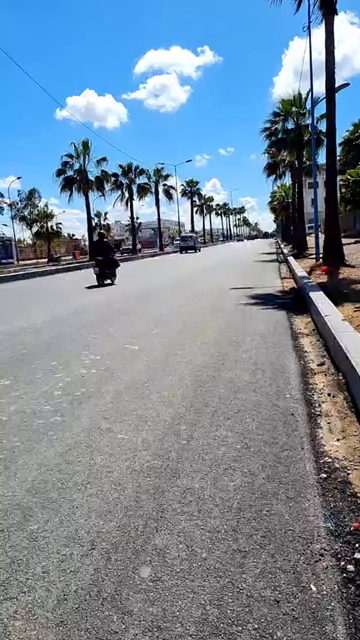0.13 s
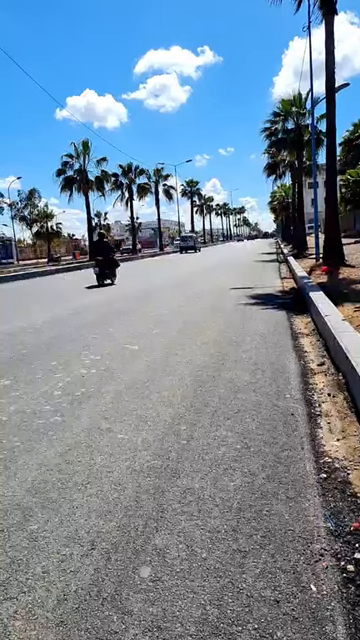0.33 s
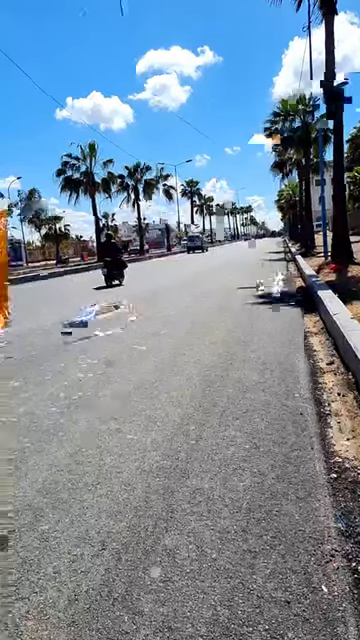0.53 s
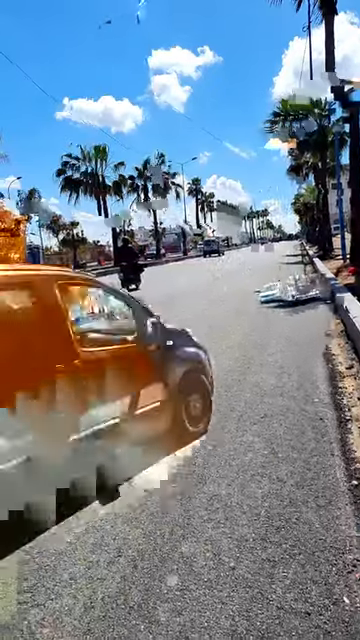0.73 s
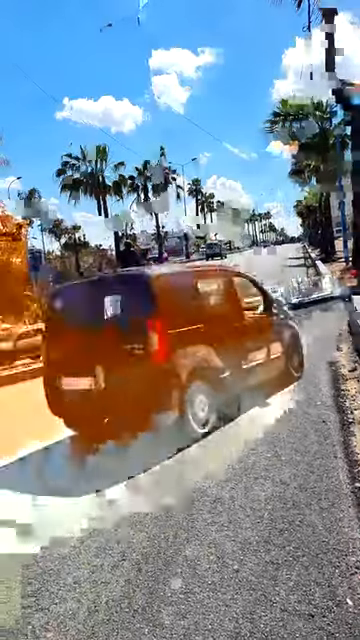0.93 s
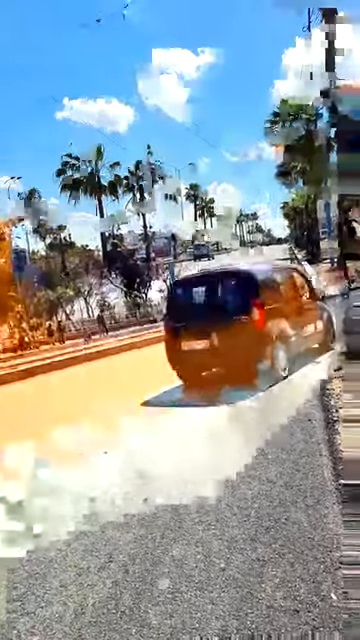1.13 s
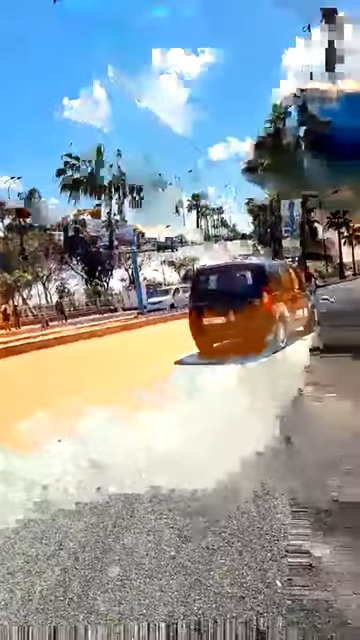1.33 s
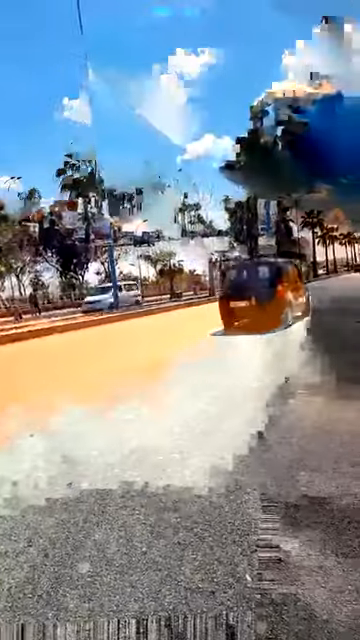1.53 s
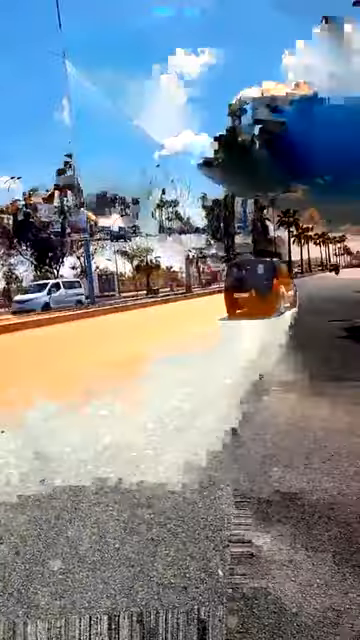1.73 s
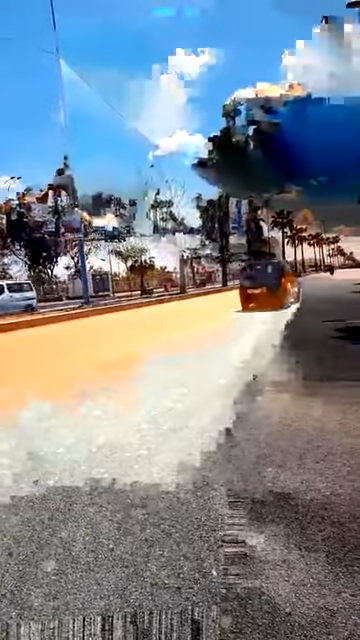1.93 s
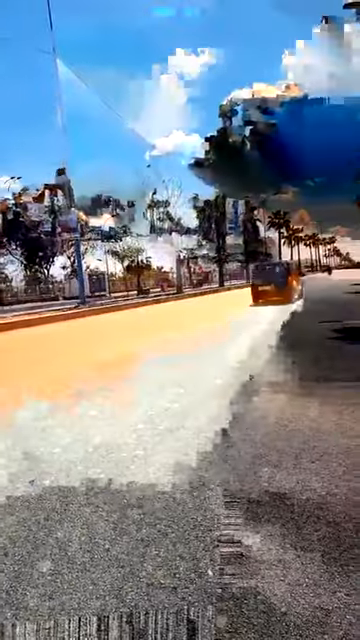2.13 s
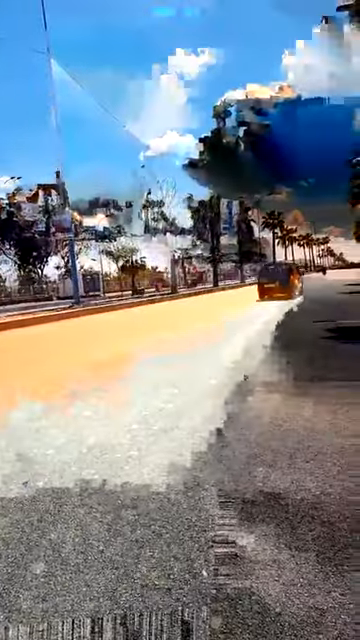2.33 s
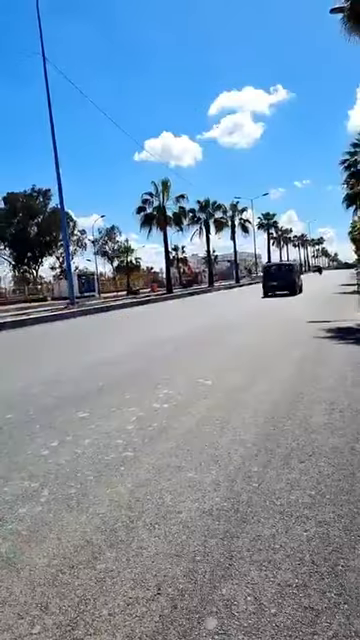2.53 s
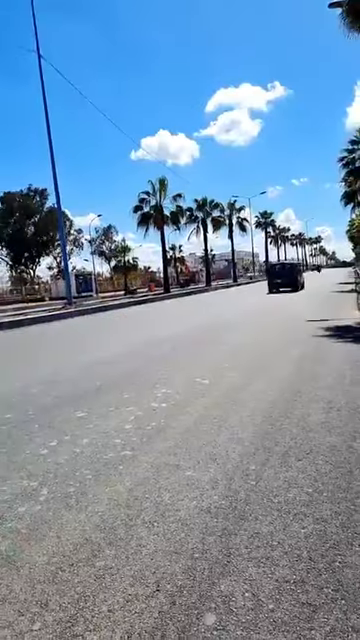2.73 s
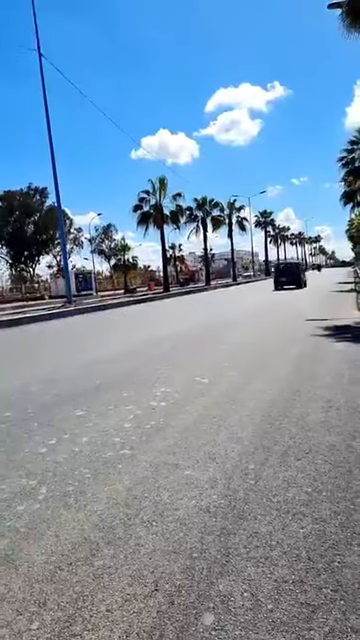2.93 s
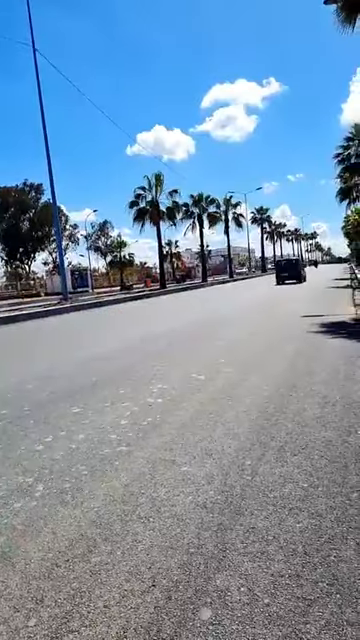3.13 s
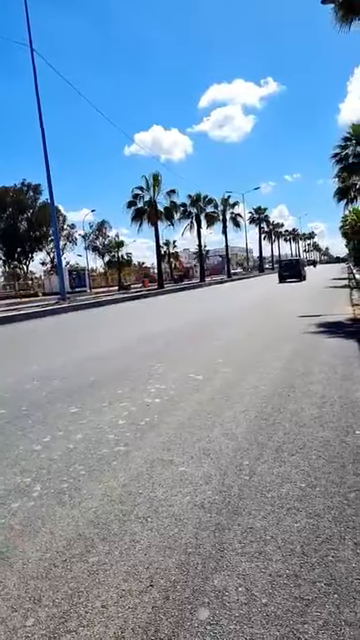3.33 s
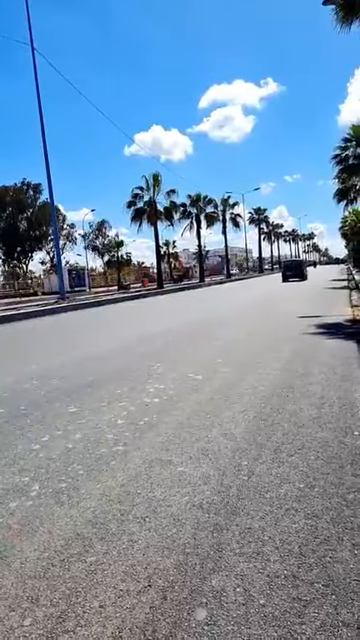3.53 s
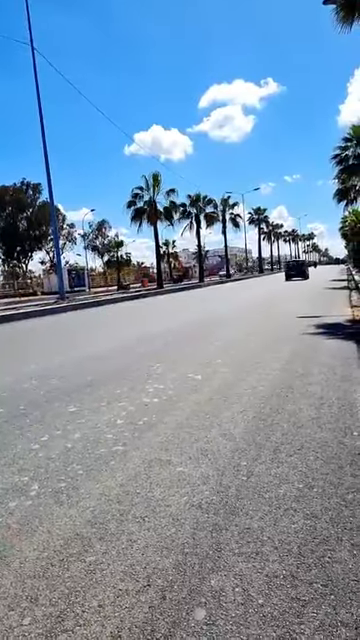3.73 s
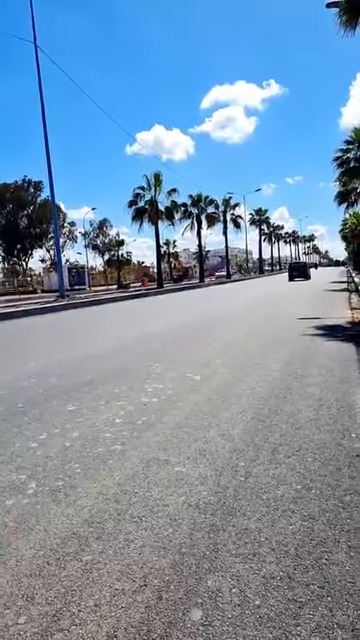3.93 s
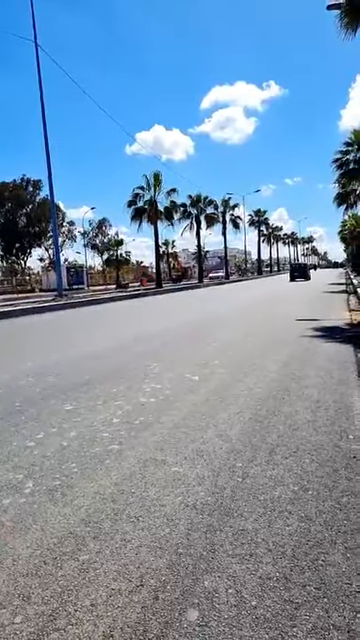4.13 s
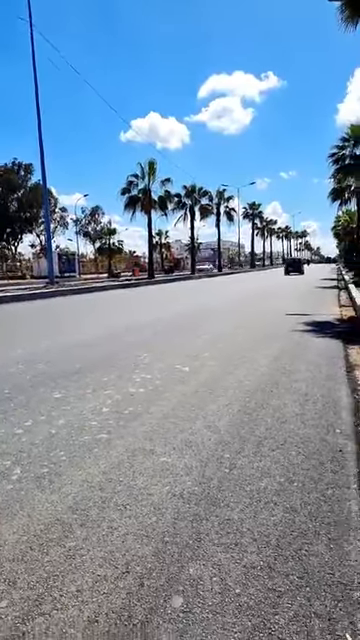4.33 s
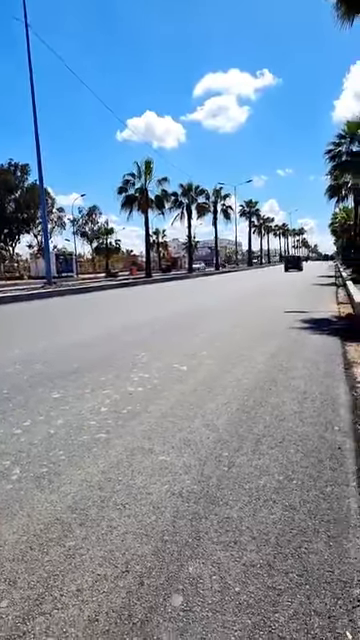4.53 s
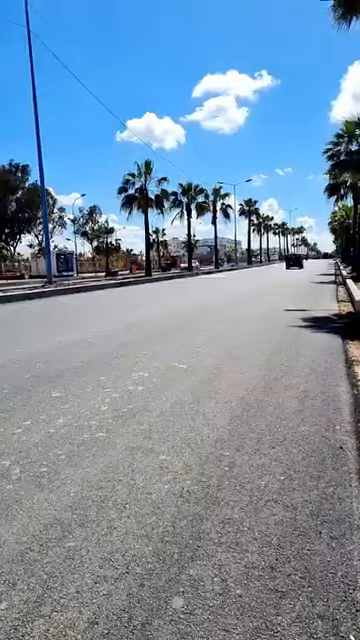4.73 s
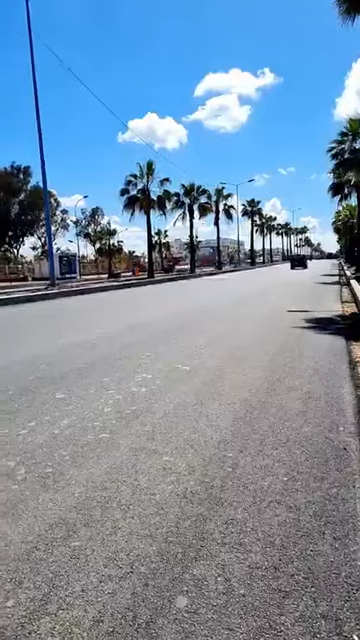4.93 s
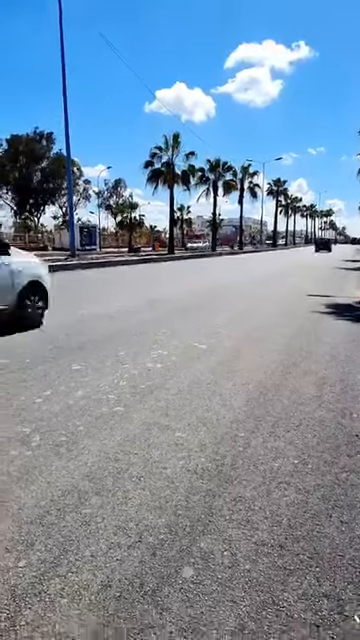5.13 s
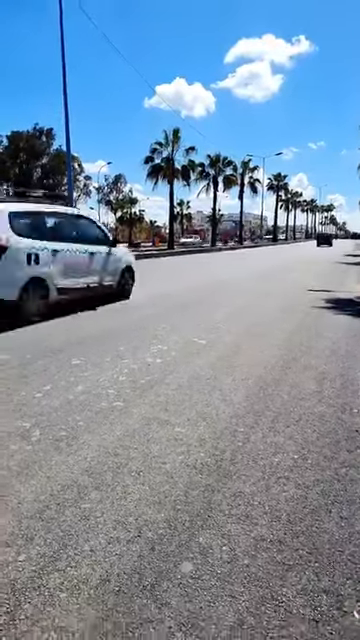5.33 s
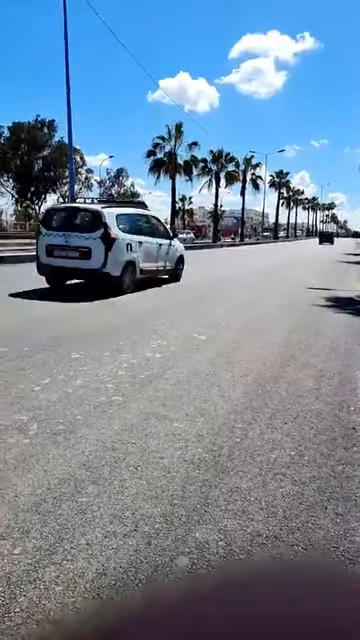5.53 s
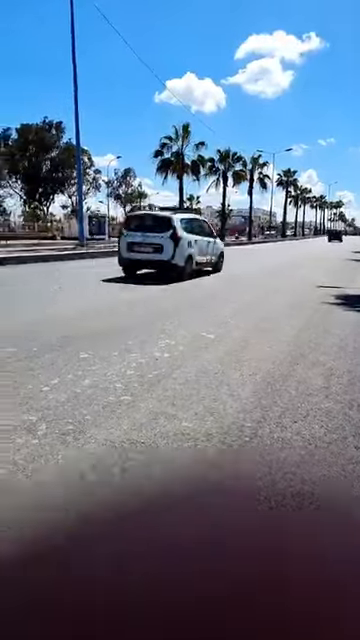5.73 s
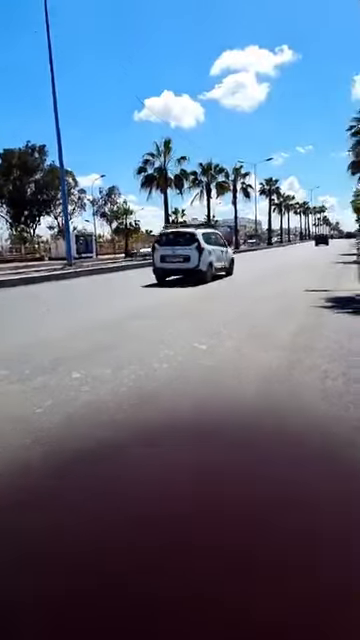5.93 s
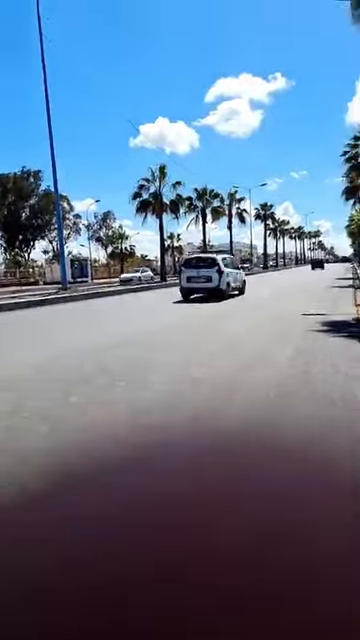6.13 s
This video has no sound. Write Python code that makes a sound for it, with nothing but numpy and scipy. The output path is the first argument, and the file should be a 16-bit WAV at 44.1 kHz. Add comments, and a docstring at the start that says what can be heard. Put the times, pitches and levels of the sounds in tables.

```python
"""Kerbside on a city avenue, with a phone as the microphone and distant traffic rumbling behind.
A small van drives off about 2 m away, exhaust droning and valves ticking; then a car comes up,
passes some 12 m out and recedes. Tyres roar and hiss on coarse asphalt, their tread noise sinking
by the Doppler effect, with a few small clicks and thumps. Near the end a finger shades the
microphone port, hollowing the sound, and taps and rubs on the case."""
import sys
import numpy as np
from scipy import signal
from scipy.fft import rfft, irfft, next_fast_len
from scipy.io import wavfile
from scipy.ndimage import uniform_filter1d, map_coordinates

SR = 44100
rng = np.random.default_rng(int(sys.argv[2]) if len(sys.argv) > 2 else 0)


def generate_wav(sig):
    """Save sig (samples, or channels by samples) to the path in sys.argv[1] as 16-bit PCM at SR."""
    pcm = np.round(np.clip(np.atleast_2d(sig).T, -1, 1) * 32767).astype(np.int16)
    wavfile.write(sys.argv[1], SR, pcm)


N = 272097


def amp(db):
    """Decibels to gain."""
    return 10 ** (np.asarray(db) / 20)


def unit(x):
    """Scale to rms 1."""
    return x / np.sqrt(np.mean(x ** 2) + 1e-20)


def clock():
    """The time of each sample in seconds."""
    return np.arange(N) / SR


def fader(points):
    """Gain at each sample from (t/s, level/dB) points."""
    return amp(np.interp(clock(), *np.transpose(points)))


def wobble(rate):
    """A smooth random curve, rate knots a second."""
    return map_coordinates(rng.standard_normal(int(N * rate / SR) + 4), [clock() * rate])


def filtered(x, response):
    """x through a filter given as gain against frequency."""
    size = next_fast_len(N + SR // 2)
    return irfft(rfft(x, size) * response(np.fft.rfftfreq(size, 1 / SR)), size)[:N]


def coloured(x, points):
    """x through (f/Hz, level/dB) points on a log frequency axis."""
    hz, db = np.transpose(points)
    return filtered(x, lambda f: amp(np.interp(np.log(f + 1), np.log(hz), db)))


def rush(spectrum, patchy_db):
    """Coloured noise of rms 1, with patches of random gain in time and frequency."""
    cells = signal.stft(rng.standard_normal(N), nperseg=512)[2]
    patches = uniform_filter1d(rng.standard_normal(cells.shape), size=5, axis=0)
    patches = unit(uniform_filter1d(patches, size=12, axis=1))
    noise = signal.istft(cells * amp(patchy_db * patches), nperseg=512)[1][:N]
    return unit(coloured(noise, spectrum))


def gliding_band(centre_hz, half_width_hz):
    """Noise of rms 1 in a band that follows a moving centre."""
    phase = 2 * np.pi * np.cumsum(centre_hz) / SR
    skirt = lambda f: 1 / (1 + (f / half_width_hz) ** 2) ** 2 + 1 / (1 + (f / half_width_hz) ** 4)
    flutter = lambda: filtered(rng.standard_normal(N), skirt)
    return unit(flutter() * np.cos(phase) + flutter() * np.sin(phase))


def drone(turns, orders, waver_db, drift_rad):
    """Engine orders, each wavering in size and phase as the path over the road changes."""
    return unit(sum(amp(db + waver_db * wobble(7)) * np.sin(2 * np.pi * k * turns + drift_rad * wobble(6))
                    for k, db in orders))


def place(abreast_s, span_s):
    """Position along the road in kerb distances (closest range to the mic); negative on approach."""
    return (clock() - abreast_s) / span_s


def nearness(position):
    """Closest distance to the mic over present distance."""
    return 1 / np.hypot(1, position)


def doppler(position, m_per_s):
    """Pitch at the mic over pitch at the vehicle, with sound travelling at 343 m/s."""
    return 1 / (1 + m_per_s * position * nearness(position) / 343)


def distant_engine(hz=108, db=-33):
    """Somewhere off in the traffic, another engine hums up briefly near the end."""
    tone = np.sqrt(2) * np.sin(2 * np.pi * hz * clock() + 0.5 * wobble(7.9))
    return amp(db) * nearness(place(abreast_s=5.78, span_s=0.24)) ** 3 * tone


# The van, then the car, passing the mic:
# abreast t/s, time to cover one kerb distance/s, roar level/dB, hiss level/dB, boom level/dB,
# tyre cavity level/dB
PASSES = [(0.749, 0.31, -26.8, -46, -28, -25.5), (4.862, 0.56, -27, -42, -29.5, -31)]


def swell(far_db, peaks_db, falloff, lead):
    """Gain of far traffic plus each pass; beamed sound falls off faster, forward sound leads."""
    power = amp(far_db) ** 2
    for (abreast_s, span_s, *_), db in zip(PASSES, peaks_db):
        power += (amp(db) * nearness(place(abreast_s, span_s) + lead) ** falloff) ** 2
    return np.sqrt(power)


def aspect(near_weight, turn, lead):
    """Power shares of tyres heard from afar, from the front and from behind."""
    front, rear = np.zeros(N), np.zeros(N)
    for abreast_s, span_s, *_ in PASSES:
        position = place(abreast_s, span_s) + lead
        near = near_weight * nearness(position) ** 4.05
        behind = (1 + np.tanh(turn * position)) / 2
        front += near * (1 - behind)
        rear += near * behind
    return np.array([np.ones(N), front, rear]) / (1 + front + rear)


# Spectra of exhaust boom and of the air cavity in the tyres: f/Hz, level/dB
BOOM = [(18, -34), (28, -18.5), (44, 4.5), (60, 8), (76, -1.5), (108, 3), (145, 0.5), (170, -2.5),
        (200, -11), (300, -58)]
CAVITY = [(120, -39.5), (185, -9), (215, 3.5), (250, 4), (285, 4), (340, -11), (480, -57)]


def rumble():
    """Exhausts boom and hollow tyres drone: steady in the distance, swelling with each pass."""
    *_, boom_db, cavity_db = np.transpose(PASSES)
    boom = swell(far_db=-31, peaks_db=boom_db, falloff=1.6, lead=0.2)
    cavity = swell(far_db=-35, peaks_db=cavity_db, falloff=2.5, lead=-0.027)
    return boom * rush(BOOM, patchy_db=1.04) + cavity * rush(CAVITY, patchy_db=0.65)


# Spectra of tyre roar and hiss, far off, facing the mic and going away: f/Hz, level/dB
ROAR_FAR = [(200, -25.5), (350, -2), (470, 0.5), (600, 2), (820, -2.5), (1250, -6), (1500, -12.5),
            (1800, -17.5), (2400, -23.5), (3500, -55.5)]
ROAR_FRONT = [(200, -23), (350, 5.5), (480, 1), (750, -1.5), (1020, 2), (1300, -2), (1650, -6.5),
              (1950, -14.5), (2500, -23.5), (3500, -54.5)]
ROAR_REAR = [(200, -32), (370, -6.5), (500, -3.5), (620, -1), (800, 5), (980, 2.5), (1250, -3),
             (1500, -10.5), (1850, -21), (2300, -27), (3500, -46)]
HISS_FAR = [(1500, -32), (2400, 1), (3200, -1), (4000, -1), (5000, -5.5), (6500, -10), (7100, -17),
            (7600, -36.5)]
HISS_FRONT = [(1500, -30.5), (2500, 2), (3200, 3.5), (3900, 5), (4700, 3.5), (5400, -4), (6500, -11.5),
              (7200, -23.5), (7700, -30.5)]
HISS_REAR = [(1500, -32.5), (2300, 0), (2800, 3), (3600, 2), (4200, 1.5), (5200, -8.5), (6300, -3.5),
             (7300, -18.5), (7900, -24.5)]


def tyres():
    """Tread on coarse asphalt roars and hisses, darkening as each vehicle shows the mic its rear."""
    _, _, roar_db, hiss_db, *_ = np.transpose(PASSES)
    far, front, rear = np.sqrt(aspect(near_weight=3.5, turn=3.1, lead=0.11))
    roar = far * rush(ROAR_FAR, 0.4) + front * rush(ROAR_FRONT, 0.9) + rear * rush(ROAR_REAR, 0.9)
    hiss = far * rush(HISS_FAR, -0.6) + front * rush(HISS_FRONT, 3.0) + rear * rush(HISS_REAR, 3.0)
    roar *= swell(far_db=-34, peaks_db=roar_db, falloff=1.86, lead=-0.03)
    hiss *= swell(far_db=-52, peaks_db=hiss_db, falloff=3.67, lead=0.12) * amp(0.5 * wobble(3))
    # uneven asphalt shakes roar and hiss together
    return amp(0.62 * wobble(45)) * (roar + hiss)


# Short knocks and clicks in the road noise:
# t/s, peak level/dB, centre f/Hz, width/centre, softness corner f/Hz, rattle share, t60/s
CLICKS = [(1.4338, -23, 650, 0.8, 1500, 0.04, 0.012), (1.6765, -21.5, 1050, 0.54, 1300, 0.14, 0.06),
          (3.6107, -23, 500, 0.8, 1500, 0.04, 0.012), (3.66, -21, 650, 0.52, 1500, 0.05, 0.013),
          (4.3886, -11, 560, 0.7, 6500, 0.05, 0.02), (5.4474, -22, 970, 0.65, 1600, 0.05, 0.012)]


def clicks():
    """Short soft knocks and clicks, one of them sharp: each a push with a brief rattle after it."""
    out = np.zeros(N)
    for s, db, hz, width, soft_hz, rattle, t60 in CLICKS:
        age = clock() - s
        blow = (age >= 0) * amp(-60 * np.abs(age) / t60) * rattle * rng.standard_normal(N)
        blow[round(s * SR)] += 1
        resonance = lambda f: 1j * f * hz * width / (hz * hz - f * f + 1j * f * hz * width)
        # a softer click has less treble
        click = filtered(blow, lambda f: resonance(f) / (1 + (f / soft_hz) ** 4))
        out += amp(db) * click / np.abs(click).max()
    return out


# Low thumps heard at the kerb: t/s, envelope level/dB, f/Hz, half length/s
THUMPS = [(4.3888, -13.5, 270, 0.0019), (4.532, -19, 69.8, 0.012), (4.605, -13.5, 79.5, 0.017),
          (4.789, -18.5, 130, 0.026), (5.139, -24.5, 255, 0.021), (5.551, -19.5, 60, 0.027)]


def thumps():
    """Low thumps, a few cycles each: one under the sharp click, several as the car passes, one after."""
    out = np.zeros(N)
    for s, db, hz, half_length in THUMPS:
        age = clock() - s
        out -= amp(db) * np.exp(-(age / half_length) ** 2) * np.sin(2 * np.pi * hz * age)
    return out


# Taps on the phone, right at the mic: t/s, peak level/dB
TAPS = [(5.7564, -17), (5.905, -25.5)]
# Modes of its case: f/Hz, level/dB, t60/s
CASE_MODES = [(2150, -3, 0.0054), (2950, -4, 0.005), (3680, -1, 0.0085), (4450, -5, 0.005),
              (5200, -8, 0.004), (6100, -6, 0.0037)]
# Spectrum of skin rubbing on the case: f/Hz, level/dB
RUB = [(1500, -30), (2500, 4), (3900, 0.5), (6000, -3.5), (7500, -14)]


def finger(touch_s=5.756, rub_db=-52):
    """Handling noise: each tap rings the case, and skin rubs faintly once it has touched."""
    taps = np.zeros(N)
    for s, db in TAPS:
        age = np.maximum(clock() - s, 0)
        ring = sum(amp(level - 60 * age / t60) * np.sin(2 * np.pi * hz * age)
                   for hz, level, t60 in CASE_MODES)
        taps += amp(db) * ring / np.abs(ring).max()
    return taps + amp(rub_db) * (clock() >= touch_s) * rush(RUB, patchy_db=3.0)


# Modes of the van's valve: f/Hz, level/dB, t60/s
VALVE_MODES = [(2750, -11, 0.044), (3960, -10, 0.023), (4444, -1, 0.023), (4640, -10.5, 0.015)]
# Spectrum of its crack and clatter: f/Hz, level/dB
CLATTER = [(1800, -30.5), (2300, -4), (2800, 6), (3500, -1.5), (4400, -1.5), (5000, -6.5), (5700, -6),
           (7400, -11.5), (7800, -14.5)]
# Ticks at the kerb, strongest as the engine bay goes by: t/s, level/dB
TICK_LEVEL = [(0.56, -46), (0.72, -49), (0.77, -42), (0.86, -45.5), (0.92, -49), (1.04, -48.5), (1.16, -54),
              (1.22, -49.5), (1.45, -63), (2.6, -80)]


def valves(turns, crank_hz, position, shift):
    """Once a crank turn a valve strikes: a dry crack, a short ring and a puff of clatter."""
    crack_db, crack_t60 = -8, 0.018
    clatter_db, clatter_t60 = -47.5, 0.31
    age = turns % 1 / crank_hz
    stroke = np.floor(turns - np.floor(turns[0])).astype(int)
    per_tick = lambda: rng.standard_normal(size=400)[stroke]
    ring = np.zeros(N)
    for hz, db, t60 in VALVE_MODES:
        # every tick strikes each mode a little differently
        cycles = hz * shift * (1 + 0.0055 * per_tick()) * age + per_tick()
        ring += amp(db + 1.3 * per_tick() - 60 * age / t60) * np.sin(2 * np.pi * cycles)
    ring = unit(ring * (1 - np.exp(-age / 0.0006)))
    crack = unit(amp(per_tick() - 60 * age / crack_t60) * rush(CLATTER, patchy_db=0.5))
    ticks = unit(amp(1.7 * per_tick()) * (ring + amp(crack_db) * crack))
    clatter = unit(amp(-60 * age / clatter_t60) * rush(CLATTER, patchy_db=3.0))
    clatter *= nearness(position - 0.28)  # loudest just past the mic
    return fader(TICK_LEVEL) * ticks + amp(clatter_db) * clatter


# Spectrum of the van's engine bay, heard from the front: f/Hz, level/dB
RASP = [(2000, -27), (2550, -6.5), (2900, 2), (3400, 4.5), (4000, -8.5), (5000, -9.5), (5800, -4.5),
        (7000, -10.5), (7700, -12)]
# Its exhaust orders: multiple of the crank rate, level/dB
VAN_ORDERS = [(2, 0), (3, -1.5), (4, 2.5), (5, 1.5), (6, -10), (7, -6.5)]
# Its drone at the kerb: t/s, level/dB
VAN_DRONE = [(0.56, -34), (1.5, -35.5), (4.4, -33), (6.17, -37.5)]


def van(m_per_s=6.9, abreast_crank_hz=41.05, rise_hz_per_s=0.22):
    """Close to the mic, a van pulls away: valves tick, engine bay rasps, tread sings, exhaust drones."""
    abreast_s, span_s, *_ = PASSES[0]
    position = place(abreast_s, span_s)
    shift = doppler(position, m_per_s)
    crank_hz = abreast_crank_hz + rise_hz_per_s * (clock() - abreast_s)
    turns = np.cumsum(crank_hz) / SR
    turns -= np.interp(0.7792, clock(), turns)  # a valve strikes at this time
    ticking = valves(turns, crank_hz, position, shift)
    rasp = amp(-39.5) * nearness(position + 0.79) ** 7 * rush(RASP, patchy_db=0.5)
    tread = amp(-31) * nearness(position) ** 6 * gliding_band(centre_hz=960 * shift, half_width_hz=170)
    exhaust = fader(VAN_DRONE) * drone(turns, VAN_ORDERS, waver_db=1.5, drift_rad=0.78)
    return ticking + rasp + tread + exhaust


# The car's engine orders: multiple of the firing rate, level/dB
CAR_ORDERS = [(1, 3.5), (2, -3.5), (3, -8), (4, -12), (5, -12)]
# Its hum at the kerb, holding through the pass until the body hides it: t/s, level/dB
CAR_HUM = [(0.56, -52), (3.3, -39), (3.75, -30.5), (4.3, -29), (4.6, -26), (5.12, -25.5), (5.3, -32.5),
           (6.17, -41.5)]
# Its tread bands: abreast f/Hz, half width/Hz, level/dB, loudest position/kerb distances, beam sharpness
CAR_TREAD = [(920, 330, -33.5, 0.36, 8.1), (2208, 400, -44.5, 0.21, 9.4), (2815, 250, -48.5, 0.47, 12),
             (4385, 1200, -43.5, -0.32, 22), (4380, 260, -59, 0.58, 11)]


def car(m_per_s=21, firing_hz=65.6):
    """Farther out, a car passes: hum and tread swell and sink in pitch, a high swish before the roar."""
    abreast_s, span_s, *_ = PASSES[1]
    position = place(abreast_s, span_s)
    shift = doppler(position, m_per_s)
    firings = np.cumsum(firing_hz * shift) / SR
    hum = fader(CAR_HUM) * drone(firings, CAR_ORDERS, waver_db=1.1, drift_rad=0.093)
    tread = sum(amp(db) * nearness(position - loudest) ** beam * gliding_band(hz * shift, half_width)
                for hz, half_width, db, loudest, beam in CAR_TREAD)
    return hum + tread


def scene():
    """Everything that reaches the kerb, in mono."""
    return (rumble() + tyres() + van() + car() + distant_engine() + thumps() + clicks())[None]


# Response of the gap between finger and microphone port: f/Hz, level/dB
FINGER_GAP = [(120, 1), (250, 1), (420, -7.5), (850, -1), (1150, -4), (1450, 1.5), (1800, 5), (2250, 6.5),
              (2650, -18), (3800, -4.5), (7000, -2)]


def record(dry):
    """The phone's mic opens abruptly, is shaded and handled by a finger, and loses the top treble."""
    start_s, top_hz = 0.564, 7500
    shade_from_s, shade_takes_s = 5.03, 0.99
    shade = np.clip((clock() - shade_from_s) / shade_takes_s, 0, 1)
    sound = (1 - shade) * dry[0] + shade * coloured(dry[0], FINGER_GAP) + finger()
    sound *= clock() >= start_s
    return filtered(sound, lambda f: 1 / (1 + (f / top_hz) ** 80))[None]


dry = scene()
out = record(dry)
generate_wav(out)
```